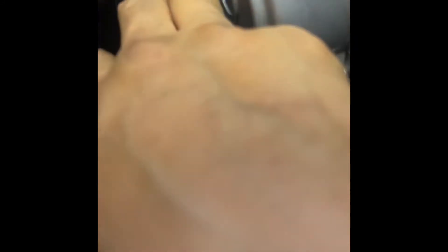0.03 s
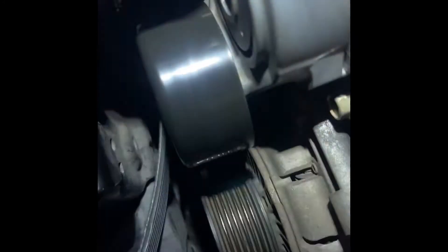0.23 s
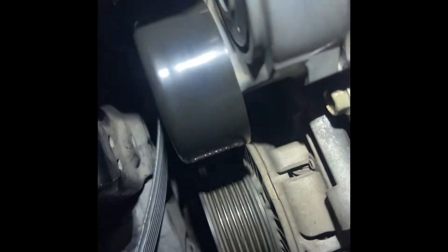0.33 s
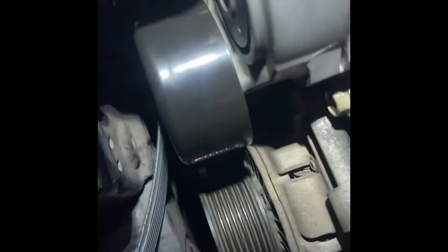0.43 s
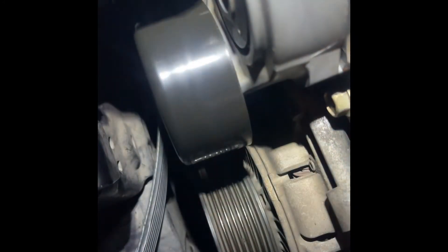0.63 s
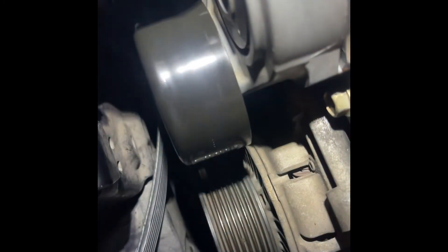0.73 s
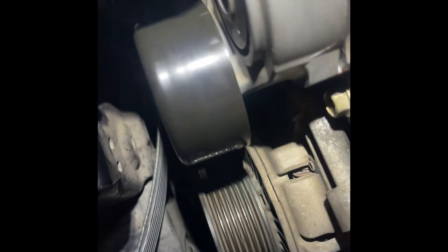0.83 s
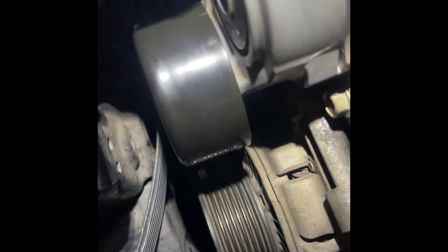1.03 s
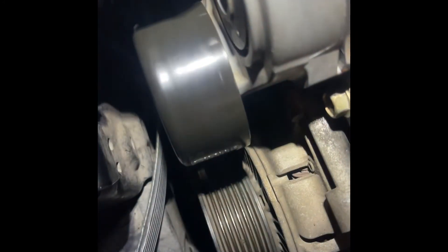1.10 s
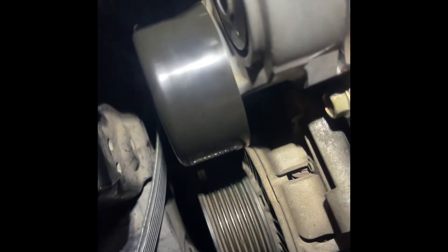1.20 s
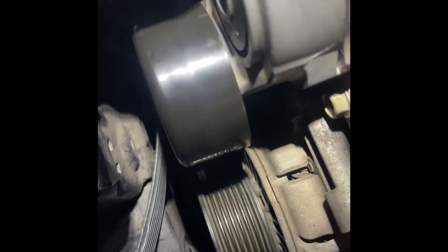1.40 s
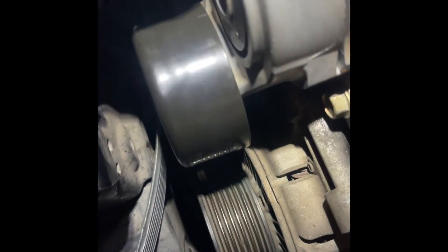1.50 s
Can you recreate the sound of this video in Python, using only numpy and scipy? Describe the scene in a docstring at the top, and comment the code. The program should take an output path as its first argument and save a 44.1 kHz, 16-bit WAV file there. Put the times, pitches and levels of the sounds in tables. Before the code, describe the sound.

A worn engine pulley spins with a dry, rattling whir, heard close up. At about 0.2 to 0.3 seconds a hand flicks it, with loud dull knocks, a brief swish and a metal clack. The bearing then coasts with high, uneven steel ticks and spells of gritty chatter, gradually weakening but still going at 1.5 seconds. A faint machine hum and soft garage air lie underneath.

```python
"""Engine bay in a garage, close up. A hand flicks a worn idler pulley: dull knocks, a swish of skin,
clacks of the bracket as the pulley rocks in its play. The dry bearing coasts on, its balls ticking
singly or chattering in spells, ringing the steel mainly between 5 and 11 kHz.
Behind it, a low machine hum and soft air noise."""
import sys
import numpy as np
from scipy import signal
from scipy.fft import rfft, irfft
from scipy.io import wavfile

SR = 44100
rng = np.random.default_rng(int(sys.argv[2]) if len(sys.argv) > 2 else 0)


def to_wav(s):
    """Save 16-bit WAV."""
    ch = np.atleast_2d(s).T  # columns
    pcm = np.round(np.clip(ch, -1, 1) * 32767)  # PCM
    wavfile.write(sys.argv[1], SR, pcm.astype(np.int16))


N = 68355
TIME = np.arange(N) / SR
FREQS = np.maximum(np.fft.rfftfreq(N, 1 / SR), 1)


def bearing():
    """Ticks and chatter ring the steel, normalised by its power gain."""
    steel_gain = np.linalg.norm(steel(signal.unit_impulse(N), wander_db=0))
    return from_db(-0.5) * steel(ticks() + chatter(), wander_db=1.7) / steel_gain


def ticks():
    """Each ball impact: one sharp contact, then a few milliseconds of rattle."""
    # ball impacts: t/s, relative level/dB
    impacts = [(0.1826, -41), (0.19, -50), (.201, -46), (.211, -44.5), (0.2184, -39.5), (.2495, -32.5),
               (0.285, -33), (0.3737, -38), (0.393, -34), (0.407, -49), (0.4173, -46), (.4245, -45),
               (0.433, -44), (0.446, -36.5), (.472, -45), (.480, -39.5), (0.501, -51), (0.508, -40.5),
               (0.526, -37), (.539, -59), (0.601, -44.5), (0.6502, -36.5), (0.663, -55), (.705, -54),
               (.7358, -43.5), (.7456, -49.5), (0.756, -47), (0.768, -46.5), (.7822, -53), (.792, -47),
               (0.805, -50), (.816, -63), (0.8266, -45), (0.8498, -43), (.877, -56), (0.964, -53),
               (1.0439, -46), (1.0728, -51), (1.088, -48), (1.105, -59), (1.118, -47), (1.146, -52),
               (1.1817, -39), (1.197, -41.5), (1.2191, -39.5), (1.2894, -47), (1.302, -44.5), (1.326, -48),
               (1.3361, -48), (1.3611, -41), (1.4205, -50), (1.476, -46.5), (1.489, -51), (1.507, -49)]
    crack_db, rattle_db, rattle_t60_s = 13, -2.5, 0.025
    cracks, rattle_power = np.zeros(N), np.zeros(N)
    for start_s, db in impacts:
        i = int(start_s * SR)
        cracks[i] += from_db(db + crack_db)
        rattle_power[i:] += from_db(db + rattle_db - 60 * TIME[:N - i] / rattle_t60_s) ** 2
    return cracks + np.sqrt(rattle_power) * rng.standard_normal(N)


def chatter():
    """Balls skid over the pitted race: spells of dense uneven grains over a faint rolling hiss."""
    # chatter spells: start/s, end/s, relative start level/dB, relative end level/dB
    spells = [(0.234, 0.269, -38, -35), (0.277, 0.381, -44.5, -40), (0.386, .400, -42, -48),
              (0.438, 0.447, -46, -41), (0.448, 0.456, -37.5, -40.5), (.511, 0.607, -48, -44.5),
              (0.61, 0.654, -51.5, -51), (0.669, 0.684, -46, -42.5), (0.711, .724, -39.5, -49.5),
              (0.885, 0.92, -52.5, -40), (0.922, 0.941, -49, -39.5), (0.977, 1.008, -44.5, -56.5),
              (1.157, 1.204, -53, -54.5), (1.233, 1.341, -49, -57), (1.358, 1.369, -41, -52),
              (1.38, 1.56, -55, -52)]
    attack_s, release_s = 0.0045, 0.0035
    roll_start_s, roll_fade_db_per_s = 0.18, 14.5
    grains_per_s, grain_share, flutter_db = 1600, 0.22, 1.07
    level = np.zeros(N)
    for start_s, end_s, start_db, end_db in spells:
        ramp = from_db(np.interp(TIME, [start_s, end_s], [start_db, end_db]) - 1.5)
        level += ramp * swell(start_s, attack_s, end_s - start_s - attack_s, release_s)
    rolling = from_db(-55 - roll_fade_db_per_s * TIME) * (TIME > roll_start_s)
    sizes = from_db(np.minimum(rng.exponential(1, N), 4)) * rng.choice([-1, 1], N)
    grains = rms_one(sizes * (rng.random(N) < grains_per_s / SR))
    grit = np.sqrt(grain_share) * grains + np.sqrt(1 - grain_share) * rng.standard_normal(N)
    flutter = from_db(flutter_db * drift(rate_hz=58))
    return (level + rolling) * flutter * grit


def steel(force, wander_db):
    """Parallel steel resonances; the contact favours now one, now another."""
    # modes of pulley and races: f/Hz, bandwidth/Hz, gain/dB
    modes = [(5310, 400, -6.5), (5940, 354, 1), (7050, 140, 6), (7420, 150, 4.5), (7830, 420, 1.5),
             (8460, 940, -0.5), (9570, 580, 4), (10380, 370, -0.5), (10580, 350, -1.5), (11730, 250, -14)]
    band_hz = [3530, 11200]
    ring = 0
    for k, (hz, width_hz, db) in enumerate(modes):
        radius = np.exp(-np.pi * width_hz / SR)
        feedback = [1, -2 * radius * np.cos(2 * np.pi * hz / SR), radius ** 2]
        drive = force * from_db(db + wander_db * drift(rate_hz=80))
        mode = (1 - radius ** 2) / 2 * signal.lfilter([1, 0, -1], feedback, drive + 1e-18)
        ring += (-1) ** k * mode
    return signal.sosfilt(signal.butter(4, band_hz, "band", fs=SR, output="sos"), ring + 1e-18)


def knocks():
    """Heavily damped knocks of the hand, then faint handling bumps."""
    # bumps: t/s, envelope peak/dB, f/Hz, rise/cycles
    bumps = [(.2005, -19.5, 157, 0.55), (0.213, -30, 47, 1), (.2405, -16, 222, 0.51),
             (.2478, -12.5, 348, 0.89), (0.2546, -14.5, 272.4, 0.92), (.2790, -13.5, 101, 0.69),
             (.2875, -17, 251, 1), (.3068, -11, 212, 0.73), (.3085, -18.5, 405, 0.9),
             (.324, -24.5, 162, 0.4), (0.339, -34.5, 60.6, 0.7), (0.491, -39, 161, 0.68),
             (.500, -30, 115, 0.55), (.535, -38.5, 150, 0.4), (.577, -36.5, 100, 0.67),
             (.607, -43.5, 81.6, 0.64), (0.666, -40.5, 50, 0.66), (.824, -43.5, 126, 1),
             (0.839, -47, 34.8, .7)]
    out = np.zeros(N)
    for start_s, db, hz, rise_cycles in bumps:
        cycles = np.maximum(TIME - start_s, 0) * hz
        rise = cycles / rise_cycles
        envelope = (rise * np.exp(1 - rise)) ** 2
        out += from_db(db) * envelope * np.sin(2 * np.pi * cycles)
    return out


def clacks():
    """The pulley rocks in its play; each clack rings the bracket's modes a little unevenly."""
    # clacks: t/s, level/dB
    hits = [(.2485, -44), (.2552, -27), (.2600, -40), (.2690, -43), (.2850, -36.5)]
    # bracket modes: f/Hz, gain/dB, T60/s
    modes = [(687, -3, 0.093), (1216, -17.5, 0.092), (1593, -6.5, 0.032), (1900, -3.5, 0.017),
             (2150, -12, .015), (4460, -5.5, 0.0093), (5760, -0.5, 0.0093)]
    out = np.zeros(N)
    for start_s, hit_db in hits:
        t = np.maximum(TIME - start_s, 0)
        for hz, mode_db, t60_s in modes:
            strike_db = hit_db + mode_db + rng.normal(0, 1)
            decay_db = np.minimum(60 * t / t60_s, 200)
            out += from_db(strike_db - decay_db) * np.sin(2 * np.pi * hz * t)
    return out


def draught():
    """Low puff of air pushed by the hand."""
    # puff spectrum: f/Hz, relative level/dB
    spectrum = [(15, -22), (35, -26), (70, -2), (150, -1), (300, -9), (500, -16), (900, -35), (4000, -66)]
    centre_s, sigma_s = 0.2624, 0.035
    envelope = np.exp(-0.5 * ((TIME - centre_s) / sigma_s) ** 2)
    return from_db(-27.5) * envelope * noise(spectrum)


def swish():
    """Skin slides off the rim."""
    # friction spectrum: f/Hz, relative level/dB
    spectrum = [(300, 2.5), (600, -1.5), (900, -6.5), (1400, -8.5), (1900, -6), (2500, -16), (3100, -10.5),
                (4000, -9.5), (6000, -13), (10000, -12), (15000, -19)]
    envelope = swell(start_s=0.2313, attack_s=0.017, hold_s=0.0053, decay_s=0.049)
    return from_db(-36.5) * envelope * diffuse(spectrum)


def bay(sound):
    """Short reflections among the engine parts, different in each channel."""
    # reflection spectrum: f/Hz, relative level/dB
    spectrum = [(40, -32), (150, -9), (300, -1), (500, 8.5), (1000, 10), (16000, -3.5)]
    first_s, t60_s = 0.00049, 0.033
    tails = np.array([noise(spectrum), noise(spectrum)])
    tails *= from_db(-60 * TIME / t60_s) * (TIME > first_s)
    tails /= np.linalg.norm(tails, axis=1, keepdims=True)
    return signal.fftconvolve(sound[None], tails, axes=1)[:, :N]


def machine_hum():
    """Harmonic hum with rumble; both dip after the flick and come back."""
    # hum harmonics: order, relative level/dB
    harmonics = [(1, 1), (2, -9), (3, -21.5), (4, -18.5), (5, -15), (6, -18.5), (7, -25), (8, -24.5)]
    # envelope of the fundamental: t/s, level/dB
    envelope = [(0, -40.5), (.19, -38), (.33, -38.5), (.40, -50), (.75, -52), (1.08, -51.5), (1.25, -45.5),
                (1.40, -42.5), (1.55, -39.5)]
    # rumble spectrum: f/Hz, relative level/dB
    rumble_spectrum = [(20, -34), (60, -11), (110, 4), (220, -8), (370, -3.5), (520, -11.5), (800, -25),
                       (2000, -54)]
    hum_hz, waver = 71.1, 0.0012
    phase = 2 * np.pi * np.cumsum(hum_hz * (1 + waver * drift(rate_hz=10))) / SR
    hum = np.zeros(N)
    for order, db in harmonics:
        hum += from_db(db) * np.sqrt(2) * np.sin(order * phase + rng.uniform(0, 2 * np.pi))
    rumble = from_db(-9.5) * diffuse(rumble_spectrum)
    return from_db(np.interp(TIME, *np.transpose(envelope))) * (hum + rumble)


def garage_air():
    """Soft air noise, sinking slightly."""
    # air spectrum: f/Hz, relative level/dB
    spectrum = [(20, -23), (60, 6.5), (150, -6), (400, 1), (700, -3), (1100, -2), (1700, -8), (2400, -7.5),
                (3400, -14), (5000, -18), (9500, -29.5), (10500, -46), (11500, -55), (15000, -58)]
    start_db, fade_db_per_s = -52, 0.91
    return from_db(start_db - fade_db_per_s * TIME) * diffuse(spectrum)


def diffuse(spectrum):
    """Stereo noise, rms 1: alike in the bass, partly opposed in the treble."""
    # left-right likeness: f/Hz, correlation
    likeness = [(60, .998), (250, 0.97), (500, 0.7), (1000, 0.41), (2000, 0.9), (4000, -0.28),
                (8000, -0.59)]
    correlation = over_hz(likeness)
    mid = irfft(rfft(noise(spectrum)) * np.sqrt(1 + correlation), N)
    side = irfft(rfft(noise(spectrum)) * np.sqrt(1 - correlation), N)
    return rms_one(np.array([mid + side, mid - side]))


def noise(spectrum):
    """Coloured mono noise, rms 1."""
    return rms_one(irfft(rfft(rng.standard_normal(N)) * from_db(over_hz(spectrum)), N))


def drift(rate_hz):
    """Smooth random wander, rms 1."""
    return rms_one(irfft(rfft(rng.standard_normal(N)) / (1 + (FREQS / rate_hz) ** 2), N))


def swell(start_s, attack_s, hold_s, decay_s):
    """Linear attack, hold, exponential decay."""
    t = TIME - start_s
    return np.clip(t / attack_s, 0, 1) * np.exp(-np.maximum(t - attack_s - hold_s, 0) / decay_s)


def over_hz(points):
    """Interpolate (f/Hz, value) rows onto FREQS in log frequency."""
    hz, value = np.transpose(points)
    return np.interp(np.log(FREQS), np.log(hz), value)


def from_db(db):
    """Decibels to gain."""
    return 10 ** (np.asarray(db) / 20)


def rms_one(x):
    """Scale to unit rms."""
    return x / np.sqrt(np.mean(x ** 2) + 1e-20)


def scene():
    """Pulley slightly left; hand and garage central."""
    right_lag_s = 0.0001648
    pulley = bearing()
    pulley_right = irfft(rfft(pulley) * np.exp(-2j * np.pi * FREQS * right_lag_s), N)
    hand = draught() + knocks() + clacks()
    reflections = bay(from_db(-32.5) * pulley + from_db(-15.5) * hand)
    return np.array([pulley, pulley_right]) + hand + swish() + reflections + machine_hum() + garage_air()


def record(dry):
    """Treble falls away above 11.5 kHz, then is cut steeply."""
    # treble response: f/Hz, gain/dB
    treble = [(10500, 0), (11500, 0.5), (12300, -9), (15000, -7)]
    cutoff_hz = 15400
    dulled = irfft(rfft(dry) * from_db(over_hz(treble)), N)
    return signal.sosfilt(signal.ellip(10, 0.1, 80, cutoff_hz, fs=SR, output="sos"), dulled)


dry = scene()
out = record(dry)
to_wav(out)
```